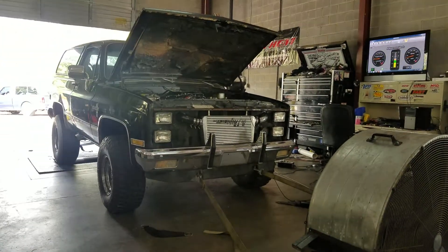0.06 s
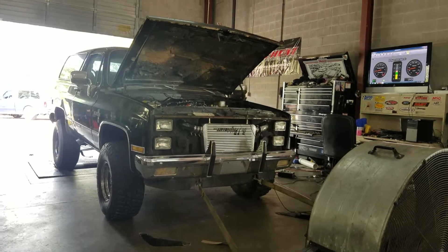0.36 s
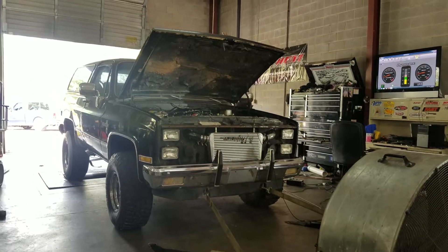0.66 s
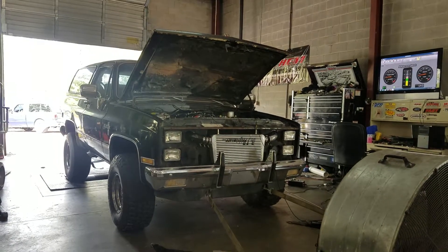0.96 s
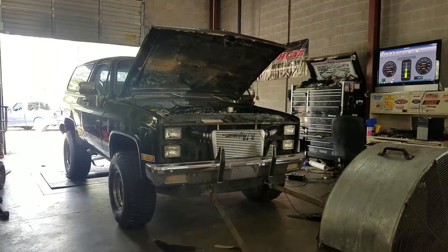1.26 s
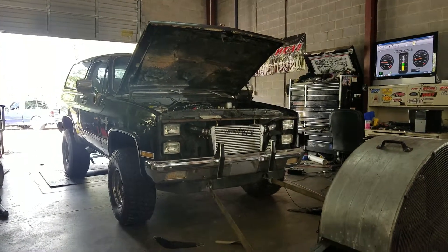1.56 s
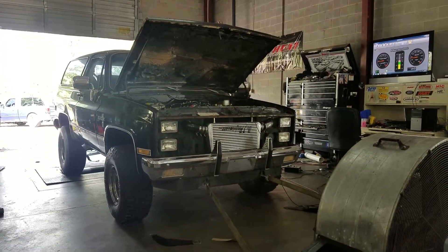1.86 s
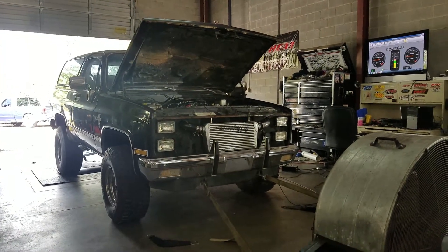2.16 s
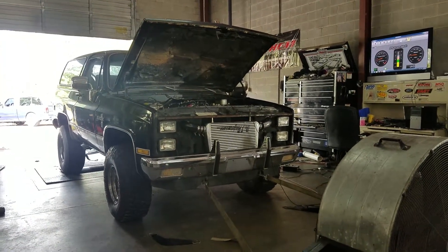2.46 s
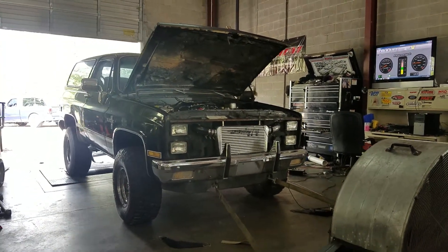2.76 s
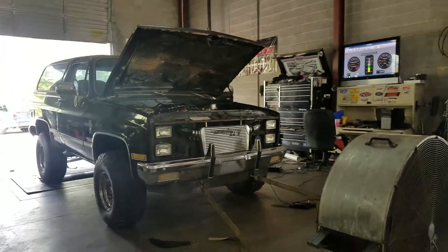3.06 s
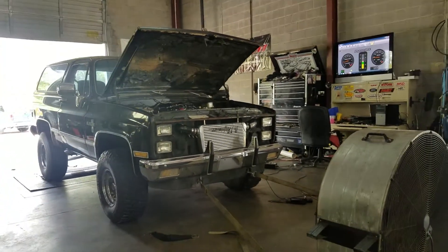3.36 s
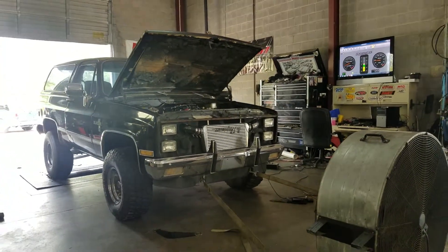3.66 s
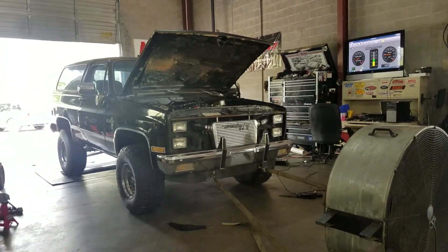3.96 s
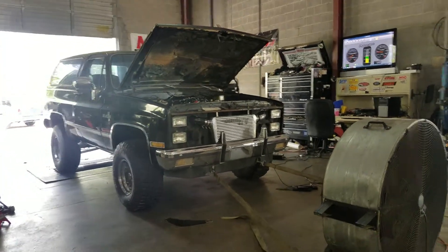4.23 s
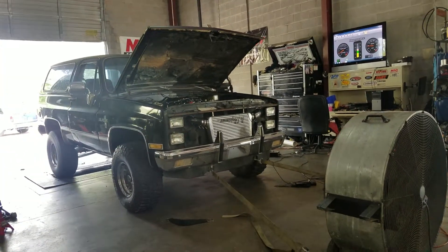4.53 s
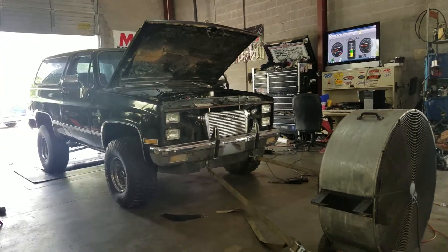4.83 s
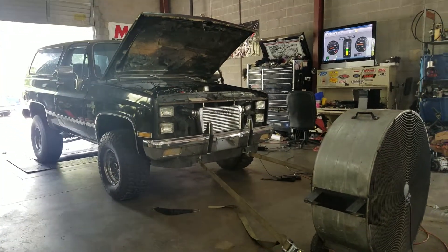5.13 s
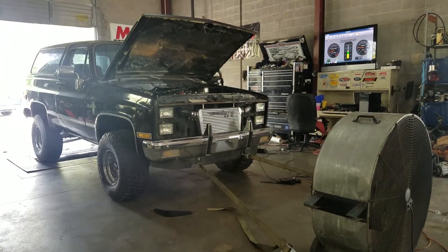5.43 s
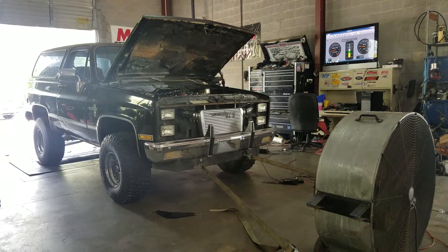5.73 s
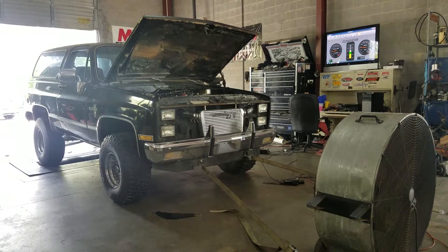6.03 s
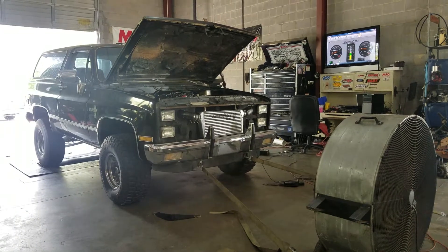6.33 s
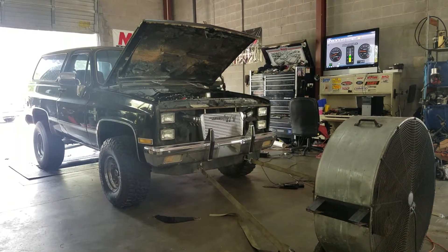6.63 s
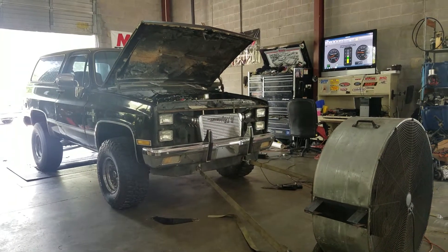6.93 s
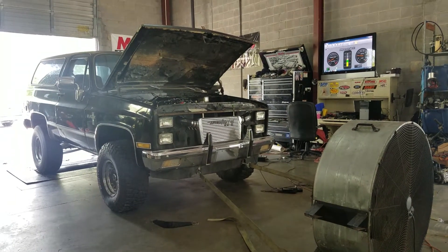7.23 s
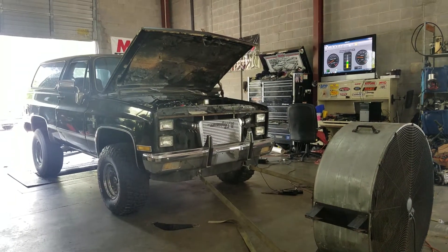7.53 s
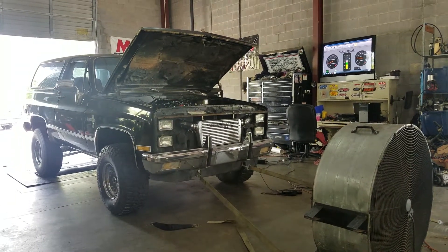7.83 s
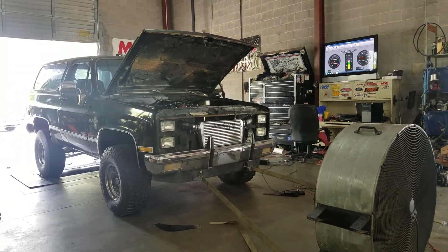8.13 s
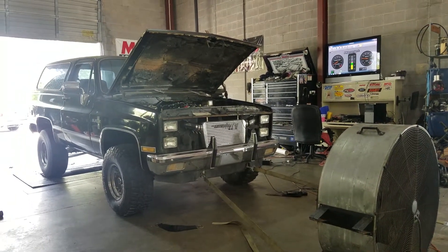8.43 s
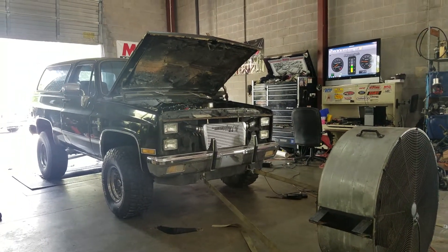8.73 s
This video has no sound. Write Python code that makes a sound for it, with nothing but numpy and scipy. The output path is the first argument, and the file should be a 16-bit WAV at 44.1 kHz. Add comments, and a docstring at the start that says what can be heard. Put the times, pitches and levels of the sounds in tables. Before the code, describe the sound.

A booming V8 engine drops in pitch at a gear change, then drones evenly over humming tyres and a blowing workshop fan.

```python
"""A turbocharged V8 truck runs on a chassis dynamometer in a workshop, a drum fan blowing at its grille.
From the start the exhaust booms on orders of the firing cycle and the valves clatter; a tick at 0.3 s.
Near 1.8 s the automatic gearbox shifts up; at 2.65 s the load is back, with turbo rush and faint squeals.
The knobbly tyres howl on the roller, the same pattern every turn, louder as the wheels gain speed.
From 7.1 s the wheels hold at about half the engine's cycle rate."""
import sys
import numpy as np
from scipy import signal
from scipy.fft import rfft, irfft
from scipy.io import wavfile
from scipy.ndimage import uniform_filter1d

SR = 44100
rng = np.random.default_rng(int(sys.argv[2]) if len(sys.argv) > 2 else 0)


def transcribe(u):
    """Save the signal u as a 16-bit wav file named by the first command-line argument.

    u: samples, shape (n,) or (channels, n), limited to [-1, 1]; the rate is SR.
    q: integer samples, one column per channel.
    """
    v = np.clip(np.atleast_2d(u).T, -1, 1)
    q = np.round(v * 32767).astype(np.int16)
    wavfile.write(sys.argv[1], SR, q)


N = 392049
TIME_S = np.arange(N) / SR
FREQS_HZ = np.maximum(np.arange(N // 2 + 1) * SR / N, 1)

# engine speed (time [s], four-stroke cycle rate [Hz])
CYCLE_RATE = [(0.0, 18.37), (0.31, 19.46), (0.37, 19.13), (1.5, 20.2), (1.7, 19.98), (1.83, 17.3),
              (2.04, 14.82), (2.3, 15.01), (2.6, 15.99), (2.9, 15.87), (3.37, 15.17), (3.7, 14.78),
              (4.22, 14.64), (4.28, 14.82), (5.71, 14.92), (6.9, 15.08), (7.23, 14.76), (8.89, 14.68)]
# wheel speed (time [s], turn rate [Hz])
WHEEL_RATE = [(0, 5.75), (2.2, 6.46), (3, 6.87), (3.6, 7.02), (7.1, 7.37), (8.89, 7.37)]


def exhaust(cycles, waver_db=2.24, uneven_db=0.3, boom_waver_db=0.72, jitter_cycles=0.0019):
    """Unevenly spaced firings of each bank give lines on multiples of the cycle rate; no two burns match."""
    # firing orders (multiple of cycle rate [1], relative level [dB])
    firing_orders = [(3, -15), (4, -24), (6, -16), (7, -16), (8, -12.5), (9, -19), (10, -8.5), (11, -9),
                     (12, -19.5), (13, -4.5), (14, -11), (15, -9.5), (16, -15), (17, -18.5), (18, -9),
                     (19, -14), (20, -11.5), (21, -10), (22, -18.5), (23, -20.5), (24, -13.5), (25, -22),
                     (26, -27.5)]
    # fixed resonances of pipes and workshop (frequency [Hz], gain [dB])
    pipe_response = [(45, -11.0), (75, -11.0), (100, -4.0), (125, 1.0), (150, -7.0), (175, 1.0),
                     (192, -11.0), (208, -16.0), (225, -2.0), (258, -4), (270, -9), (290, -8.0),
                     (320, -8.0), (340, -3), (385, -8), (440, -19.0), (520, -17.0)]
    # turbulent gas at the tailpipe (frequency [Hz], relative density [dB])
    puff_spectrum = [(50, -15), (90, -18), (150, -2.5), (280, 7), (380, -1.5), (520, -7), (900, -38)]
    cycle_hz = in_time(CYCLE_RATE)
    cycle_rad = 2 * np.pi * (cycles + jitter_cycles * drift(5.3))
    growl = np.zeros(N)
    for order, order_db in firing_orders:
        level_db = order_db + at_hz(pipe_response, order * cycle_hz) + waver_db * drift(2.54)
        growl += from_db(level_db) * np.sin(order * cycle_rad + 2 * np.pi * rng.random())
    growl = evened(growl, span_samples=0.012 * SR, share=0.15)  # cylinders push about equally hard
    growl *= from_db(load_db(half_db=-12.5, range_db=5.5) + uneven_db * drift(16))
    boom = np.sin(5 * cycle_rad)
    boom_db = load_db(half_db=-7.5, range_db=2.5) + at_hz(pipe_response, 5 * cycle_hz)
    boom_db += boom_waver_db * drift(5.2)
    puffs = from_db(load_db(half_db=-28.5, range_db=5.5)) * air(puff_spectrum) * (1 + 0.5 * boom)
    return np.sqrt(2) * (growl + from_db(boom_db) * boom) + puffs


def tyres(turns, scatter_db=5.0, high_spot_turns=0.85, turn_samples=16384):
    """Tread blocks strike the roller: one turn, looped in three registers through the groove resonances."""
    # tread envelope (multiple of wheel rate [1], relative level [dB])
    tread_envelope = [(13, -49), (19, -41.5), (28, -38.5), (34, -48), (46, -31), (55, -44.5), (65, -45),
                      (78, -58), (90, -43.5), (105, -36), (125, -32), (142, -34.5), (160, -41),
                      (197, -43.5), (205, -54.5), (265, -54.5), (330, -61), (420, -68)]
    # strong tread lines (multiple of wheel rate [1], relative level [dB])
    tread_lines = [(21, -24), (22, -22), (23, -23), (24, -20), (26, -25.5), (37, -29), (39, -20), (45, -31),
                   (117, -23.5), (118, -29.5), (120, -24.5), (124, -28), (127, -30), (130, -37), (145, -34),
                   (147, -29), (148, -24.5), (154, -33), (160, -31), (179, -44), (198, -37.5)]
    # groove air, ringing at fixed pitches (frequency [Hz], gain [dB])
    groove_response = [(300, 0), (420, -5), (560, -13), (700, -7), (770, -3), (850, 5), (910, 3), (990, -1),
                       (1080, 3), (1160, -2), (1420, -4), (1530, -13), (3000, -14)]
    orders = np.arange(1, 421)
    level_db = at_hz(tread_envelope, orders) + scatter_db * rng.standard_normal(len(orders))
    for order, line_db in tread_lines:
        level_db[order - 1] = line_db
    phase = rng.random((2, len(orders)))
    # out of round: the lugs press hardest once a turn, so their note throbs
    lugs = (orders >= 21) & (orders <= 25)
    phase[0, lugs] = -high_spot_turns * orders[lugs]
    mid, side = from_db(level_db) * np.exp(2j * np.pi * phase)
    cruise_hz = orders * WHEEL_RATE[-1][1]
    lines = widen(mid, side, cruise_hz)
    lines /= from_db(at_hz(groove_response, cruise_hz))  # groove gain cancels at cruise
    traction_db = load_db(half_db=0, range_db=3.5)
    thrum_db = rolling_db(swell_hz=(6.8, 7.3), swell_db=(-22, -17.5))
    howl_db = rolling_db(swell_hz=(6.45, 6.98), swell_db=(-24, -19.5)) + traction_db
    slap_db = rolling_db(swell_hz=(6.98, 7.17), swell_db=(-24, -19.5)) + traction_db
    register = np.digitize(orders, [80, 131])
    position = turns % 1 * turn_samples
    tread = np.zeros((2, N))
    for k, gain_db in enumerate([thrum_db, howl_db, slap_db]):
        own = register == k
        one_turn = irfft(np.pad(lines * own, ((0, 0), (1, 0))), turn_samples)
        one_turn *= turn_samples / np.sqrt(2) / np.linalg.norm(mid[own])
        if k > 0:  # small blocks strike with much the same force all round
            one_turn = evened(one_turn, span_samples=0.13 * turn_samples, share=0.6)
        looped = np.array([np.interp(position, np.arange(turn_samples), channel) for channel in one_turn])
        tread += from_db(gain_db) * looped
    return irfft(rfft(tread) * from_db(at_hz(groove_response, FREQS_HZ)), N)


def fan(level_db=-27, flutter_db=0.2):
    """Steady rush of air plus narrow resonances of the drum."""
    # airflow (frequency [Hz], relative density [dB])
    flow_spectrum = [(25, -14), (50, -18), (150, -5), (350, 1), (560, -3), (820, -3), (1080, -2),
                     (1400, -6), (1650, -15), (2400, -20.5), (3400, -23), (4700, -25.5), (7000, -31),
                     (9500, -33), (11500, -28), (16000, -28.5)]
    # housing resonances (frequency [Hz], half width [Hz], level [dB])
    drum_modes = [(777, 51, -38.5), (1067, 39, -31.5), (1224, 17, -35.5), (4650, 260, -51.5)]
    tones = sum(from_db(db) * noise(1 / (1 + ((FREQS_HZ - hz) / width_hz) ** 2))
                for hz, width_hz, db in drum_modes)
    return from_db(level_db - flutter_db * drift(17)) * air(flow_spectrum) + tones


def valve_clatter(cycles, level_db=-30.5, firing_depth=0.25, lope_depth=0.063):
    """Valve noise pulses with the eight firings of a cycle, with a slight lope."""
    # valve noise (frequency [Hz], relative density [dB])
    clatter_spectrum = [(500, -3), (900, 0), (1400, 0), (1700, -7), (2500, -13.5), (3500, -18.5),
                        (4800, -17), (7000, -25.5), (16000, -31.5)]
    cycle_rad = 2 * np.pi * cycles
    lope = np.cos(cycle_rad) + np.cos(2 * cycle_rad)
    pulse = 1 + firing_depth * np.cos(8 * cycle_rad) + lope_depth * lope
    return from_db(level_db) * air(clatter_spectrum) * pulse


def accessory_whine(cycles, ring_hz=1815, width_hz=130, full_strain_hz_per_s=1.25, smooth_s=0.26):
    """Two orders of the accessory drive sing as they cross a resonance, louder while the revs change."""
    # drive orders (multiple of cycle rate [1], relative level [dB])
    drive_orders = [(96, -3), (120, 0)]
    cycle_hz = in_time(CYCLE_RATE)
    strain_hz_per_s = uniform_filter1d(np.abs(np.gradient(cycle_hz, TIME_S)), int(smooth_s * SR))
    level_db = np.interp(strain_hz_per_s, [0, full_strain_hz_per_s], [-41, -33.5])
    whine = np.zeros((2, N))
    for order, order_db in drive_orders:
        gain = from_db(order_db) / np.hypot(1, 2 * (order * cycle_hz - ring_hz) / width_hz)
        for channel in whine:
            tone = np.sin(2 * np.pi * order * cycles + 1.1 * drift(12))
            channel += gain * tone * from_db(2.5 * drift(10))
    return from_db(level_db) * whine


def turbo(rush_at_s=2.65, rush_db=-29, rise_s=0.12, fall_s=0.17, flutter_db=2.0):
    """Intake air follows the load; one brief rush as the turbo spools up after the shift."""
    # intake air (frequency [Hz], relative density [dB])
    intake_spectrum = [(600, -28), (1000, 16), (1600, 12.5), (2800, 7.5), (4000, 4), (6300, -3.5),
                       (8000, -8), (13000, -10), (16000, -25)]
    since_s = TIME_S - rush_at_s
    rush = from_db(rush_db) * np.exp(-np.maximum(-since_s / rise_s, since_s / fall_s))
    intake = from_db(load_db(half_db=-38, range_db=10.5))
    return np.hypot(intake, rush) * from_db(flutter_db * drift(21)) * air(intake_spectrum)


def squeals(waver_rad=0.92):
    """Faint unsteady tones swell and fade around the shift and as the load returns."""
    # squeals (centre time [s], pitch [Hz], half length [s], level [dB])
    notes = [(2.697, 2870, 0.029, -34), (1.7, 3760, .035, -48), (2.68, 700, 0.15, -23.5),
             (2.823, 2990, .022, -40), (3.24, 2520, 0.059, -36)]
    tones = np.zeros(N)
    for centre_s, hz, half_s, db in notes:
        swell = from_db(db) * np.exp(-((TIME_S - centre_s) / half_s) ** 2)
        tones += swell * np.sin(2 * np.pi * hz * TIME_S + waver_rad * drift(30))
    return tones


def tick(decay_s=0.001):
    """A dry tick: a sharp edge that dies at once."""
    # onset (time [s], level [dB])
    onsets = [(0.286, -3.5)]
    return sum(from_db(db) * (TIME_S >= at_s) * np.exp(-np.abs(TIME_S - at_s) / decay_s)
               for at_s, db in onsets)


def load_db(half_db, range_db):
    """Level over time: half_db at half load, rising by range_db from no load to full."""
    # engine load, slack during the shift (time [s], share of full load [0-1])
    engine_load = [(0, 0.76), (.5, 0.63), (1.15, 0.73), (1.65, 0.54), (2.1, 0.28), (2.65, 0.98), (3.4, 0.6),
                   (4.9, 0.82), (6.4, 0.14), (7.7, 0.59), (8.89, 0.66)]
    return half_db + range_db * (in_time(engine_load) - 0.5)


def rolling_db(swell_hz, swell_db, slope_db_per_hz=4.5):
    """Tyre level over time: a swell between two wheel rates plus a steady slope, zero at cruise."""
    wheel_hz = in_time(WHEEL_RATE)
    return np.interp(wheel_hz, swell_hz, swell_db) + slope_db_per_hz * (wheel_hz - wheel_hz[-1])


def air(spectrum, low_cut_hz=20):
    """Stereo noise coloured by a (Hz, dB) table."""
    return noise(from_db(at_hz(spectrum, FREQS_HZ)) * FREQS_HZ ** 2 / (FREQS_HZ ** 2 + low_cut_hz ** 2))


def noise(bin_gain):
    """Shaped stereo noise; mid rms 1."""
    mid, side = rfft(rng.standard_normal((2, N))) * bin_gain
    stereo = irfft(widen(mid, side, FREQS_HZ), N)
    return stereo / np.std(stereo.mean(axis=0))


def widen(mid, side, hz):
    """Mid and side spectra to left and right: alike in the bass, diffuse in the treble."""
    # left-right likeness (frequency [Hz], coherence [0-1])
    likeness = [(60, 0.92), (130, 0.95), (290, 0.97), (640, 1), (1000, 0.8), (1410, 0.11), (2200, 0.23),
                (6800, 0.019), (16000, 0.11)]
    coherence = np.clip(at_hz(likeness, hz), 0, 0.999)
    return mid + np.sqrt((1 - coherence) / (1 + coherence)) * side * np.array([[1], [-1]])


def evened(x, span_samples, share):
    """Flatten a share of the swells, keeping the overall level."""
    power = uniform_filter1d(np.atleast_2d(x ** 2).mean(axis=0), int(span_samples), mode="wrap") + 1e-12
    flat = x / power ** (share / 2)
    return flat * np.std(x) / np.std(flat)


def drift(corner_hz, hop_samples=100, settle_hops=1000):
    """Slow random wander, rms 1."""
    pole = np.exp(-2 * np.pi * corner_hz * hop_samples / SR)
    white = rng.standard_normal(N // hop_samples + settle_hops + 2)
    slow = signal.lfilter([1], [1, -2 * pole, pole ** 2], white)[settle_hops:]
    slow /= np.sqrt(np.mean(slow ** 2))
    return np.interp(np.arange(N) / hop_samples, np.arange(len(slow)), slow)


def from_left(x, lag_s):
    """A source on the left reaches the right channel later."""
    return np.array([x[0], np.interp(TIME_S - lag_s, TIME_S, x[1])])


def in_time(curve):
    """A (time, value) table at every sample."""
    return np.interp(TIME_S, *np.transpose(curve))


def at_hz(spectrum, hz):
    """Interpolate a table on a log frequency axis."""
    knots_hz, values = np.transpose(spectrum)
    return np.interp(np.log(hz), np.log(knots_hz), values)


def from_db(db):
    """Decibels to gain."""
    return 10 ** (np.asarray(db) / 20)


def scene():
    """Crank and wheels turn at their own speeds; the workshop favours left or right by frequency."""
    # workshop balance (frequency [Hz], left minus right [dB])
    balance = [(60, 1), (110, -2.5), (200, 0.5), (380, -3), (700, 4), (1290, -2.5), (2380, 0.5), (4400, -4),
               (8120, 0), (15000, -2.5)]
    cycles = np.cumsum(in_time(CYCLE_RATE)) / SR
    turns = np.cumsum(in_time(WHEEL_RATE)) / SR
    front = valve_clatter(cycles) + accessory_whine(cycles) + turbo() + squeals() + fan() + tick()
    mix = from_left(exhaust(cycles), lag_s=0.0002166)
    mix += from_left(tyres(turns), lag_s=0.0001)
    mix += from_left(front, lag_s=0.00037)
    channel_db = at_hz(balance, FREQS_HZ) * np.array([[0.5], [-0.5]])
    return irfft(rfft(mix) * from_db(channel_db), N)


def record(dry, cutoff_hz=15900):
    """Soft clip of the highest peaks, then a steep low-pass."""
    rounded = dry / (1 + dry ** 8) ** (1 / 8)
    return signal.sosfilt(signal.ellip(12, 0.1, 90, cutoff_hz, fs=SR, output="sos"), rounded)


dry = scene()
out = record(dry)
transcribe(out)
```